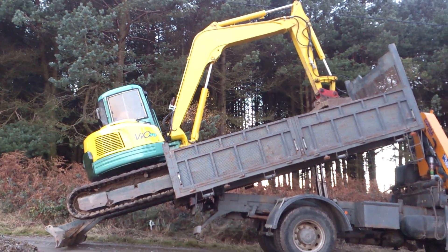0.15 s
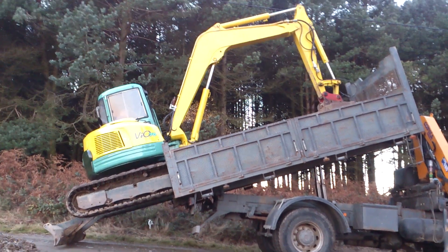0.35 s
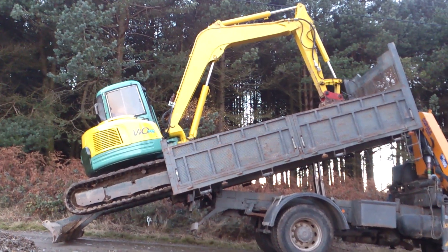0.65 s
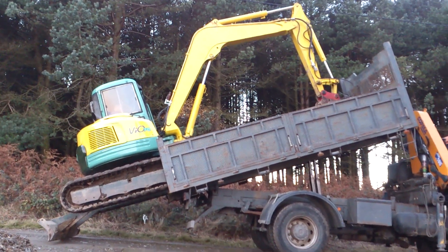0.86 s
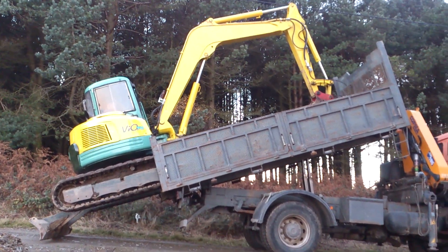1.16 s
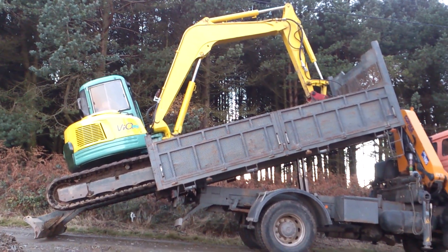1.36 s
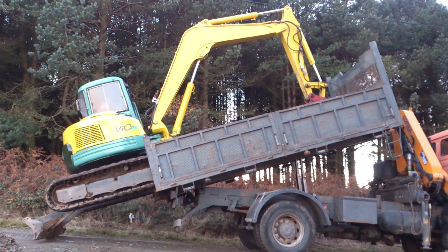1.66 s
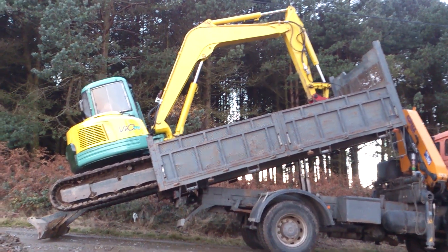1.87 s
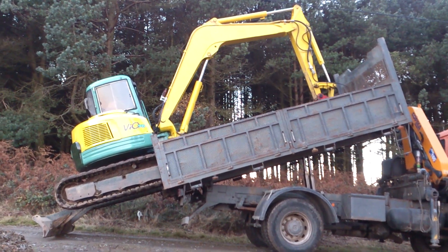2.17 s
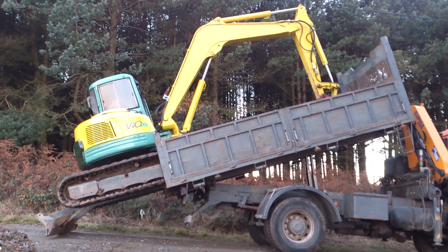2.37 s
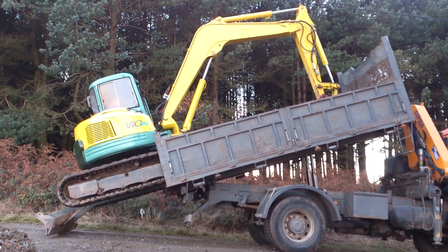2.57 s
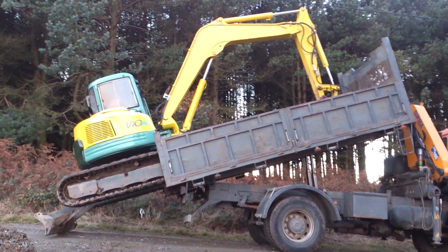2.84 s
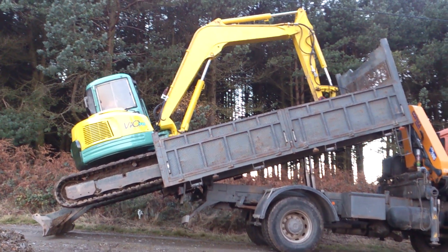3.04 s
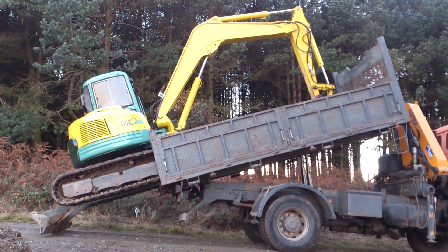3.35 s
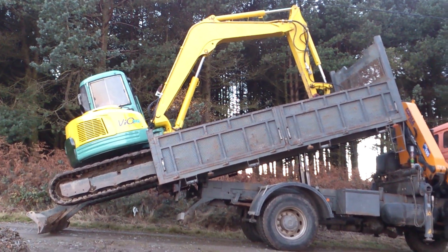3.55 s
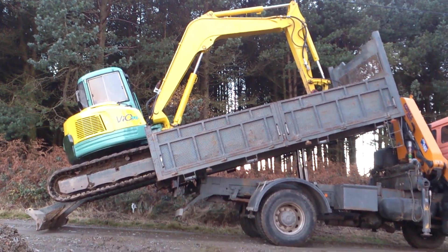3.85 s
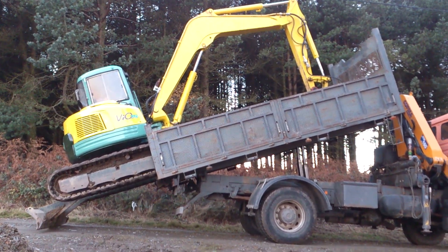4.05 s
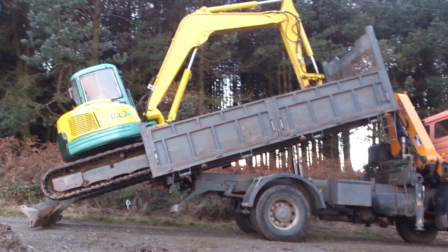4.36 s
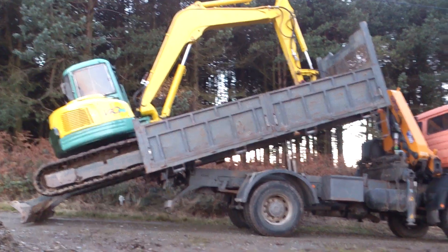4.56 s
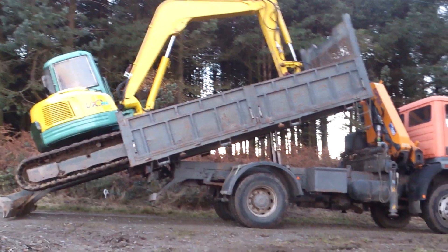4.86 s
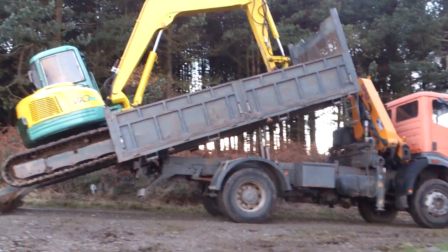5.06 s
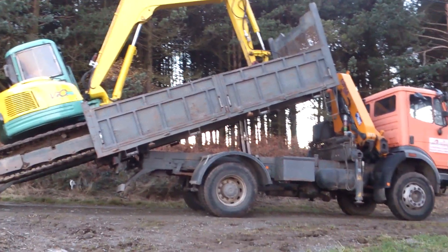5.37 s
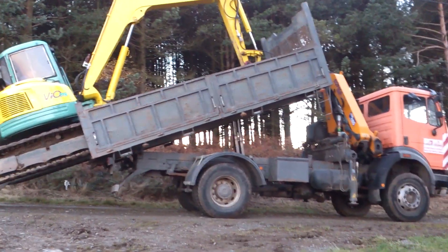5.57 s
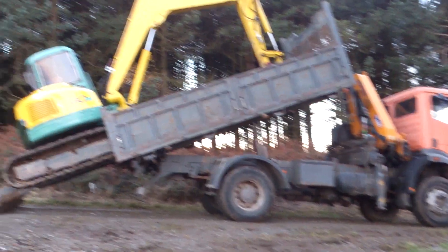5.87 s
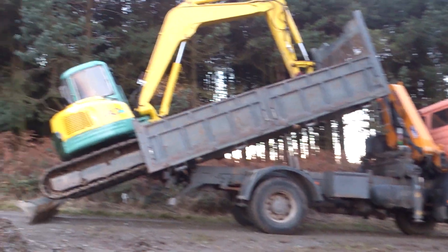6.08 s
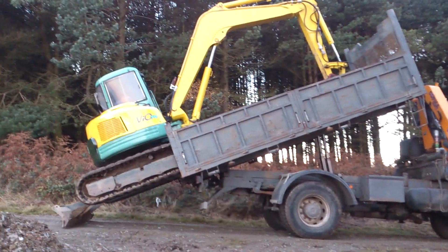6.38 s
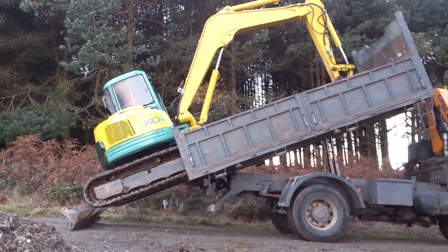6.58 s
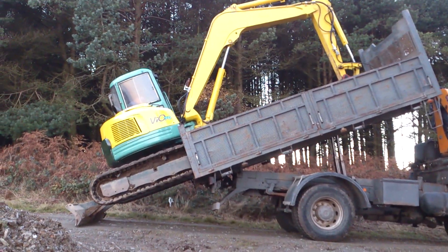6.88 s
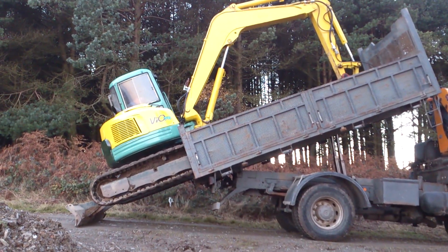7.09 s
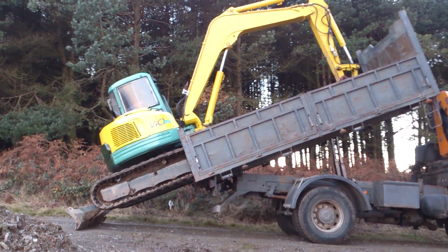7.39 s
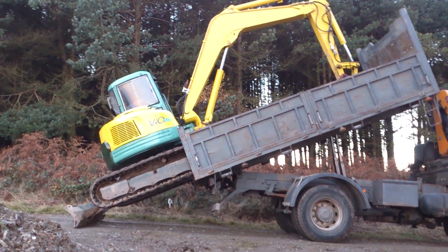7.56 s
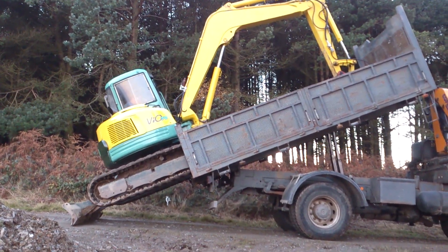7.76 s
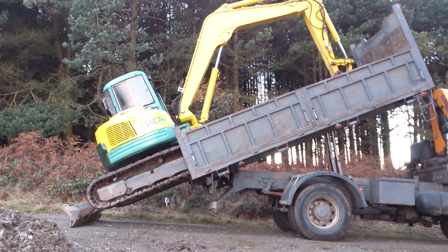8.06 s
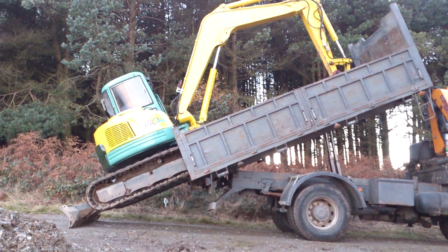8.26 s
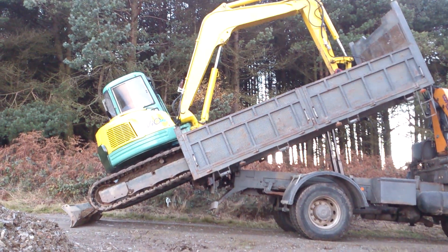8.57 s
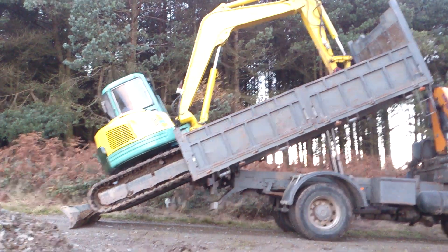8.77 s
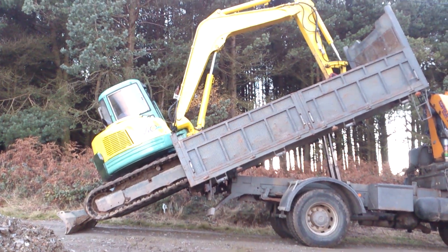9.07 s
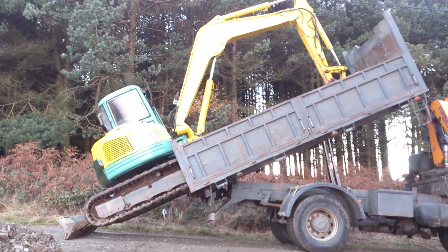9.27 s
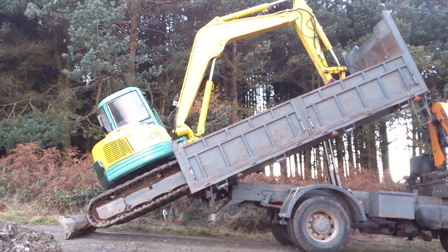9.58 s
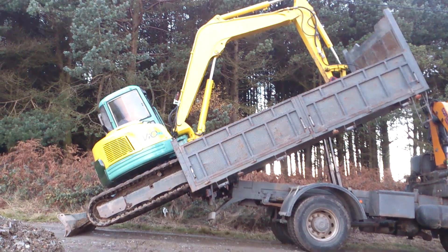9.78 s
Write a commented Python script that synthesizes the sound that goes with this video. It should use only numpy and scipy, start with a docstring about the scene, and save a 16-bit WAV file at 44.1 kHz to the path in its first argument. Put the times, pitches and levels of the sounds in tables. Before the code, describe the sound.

Uneven diesel clatter runs steadily under gusty wind rumble, broken by one loud metal bed crash, then gritty scrapes and hollow track-link clacks.

```python
"""A small diesel excavator idles its way backwards off a tipped steel truck bed, outdoors, at one microphone.
Four uneven cylinders knock and tick over sine-wave exhaust hum, fan noise, a thin whistle and a narrow hiss.
Wind is shaped noise following gusts, with single pressure swings where hard eddies hit the microphone.
The bed clanks and crashes under the weight: noise bursts, ringing modes and a tail from the trees.
The tracks scrape as swelling grit noise and clack as snaps with a hollow ring."""
import sys
import numpy as np
from scipy import signal
from scipy.fft import rfft, irfft, next_fast_len
from scipy.io import wavfile

SR = 44100
rng = np.random.default_rng(int(sys.argv[2]) if len(sys.argv) > 2 else 0)


def digitize_waveform(pressure):
    """Quantize a signal to 16-bit integers and store it at the path in sys.argv[1].

    Rows of a 2-D input are taken as channels; values are limited to [-1, 1].
    """
    field = np.atleast_2d(pressure).T
    bounded = np.clip(field, -1, 1)
    quanta = np.round(bounded * 32767).astype(np.int16)
    wavfile.write(sys.argv[1], SR, quanta)


N = 437913
TIME = np.arange(N) / SR


def amp(db):
    """Decibels to gain."""
    return 10 ** (np.asarray(db) / 20)


def unit(x):
    """Scales to an rms of one."""
    return x / np.sqrt(np.mean(x ** 2) + 1e-20)


def add(mix, s, sound):
    """Mixes a sound in at time s, cut off at the end of the mix."""
    part = mix[max(round(s * SR), 0):][:len(sound)]
    part += sound[:len(part)]


def colour(x, spectrum, loss_db=0):
    """Shapes x by a spectrum (f/Hz, level/dB), with a loss per octave about 3 kHz; rms one."""
    octave = np.log2(np.fft.rfftfreq(2 * len(x), 1 / SR) / 3000 + 1e-3)  # the offset avoids log of zero
    hz, db = np.transpose(spectrum)
    gain = amp(np.interp(octave, np.log2(hz / 3000), db) - loss_db * octave)
    size = next_fast_len(len(x), True)
    gain = np.interp(np.fft.rfftfreq(size), np.fft.rfftfreq(2 * len(x)), gain)
    shaped = irfft(rfft(x, size) * gain, size)
    return unit(shaped[:len(x)])


def noise(spectrum, size, loss_db=0):
    """Coloured noise of rms one."""
    return colour(rng.standard_normal(size), spectrum, loss_db)


def resonate(x, modes):
    """Passes x through parallel resonances (f/Hz, width/Hz, level/dB) of alternating sign."""
    out = np.zeros(len(x))
    for k, (hz, width, db) in enumerate(modes):
        peak = signal.iirpeak(hz, hz / width, SR)
        out += (-1) ** k * amp(db) * signal.lfilter(*peak, x)
    return out


def drift(hz):
    """Random wander of rms one, with hz new values a second joined by straight lines."""
    knots = np.arange(0, TIME[-1] + 1, 1 / hz)
    return unit(np.interp(TIME, knots, rng.standard_normal(len(knots))))


def burst(t, rise, t60, length=0):
    """Swells to one within the rise time, holds to the given length, then dies away."""
    held = max(rise, length)
    return np.clip(t / rise, 0, 1) * np.exp(-np.log(1000) * np.maximum(t - held, 0) / t60)


# engine speed: t/s, firing rate f/Hz
FIRING_RATE = [(0.0, 33.66), (0.6, 34.26), (1.2, 34.58), (1.8, 35.21), (2.4, 35.11), (3.2, 35.39),
               (4.5, 35.22), (6.0, 35.18), (7.2, 35.17), (8.2, 35.04), (9.93, 35.18)]
FIRST_FIRING_S = .0385


def engine_turns():
    """Engine position, counted in firings: the running sum of the firing rate."""
    turns = np.cumsum(np.interp(TIME, *np.transpose(FIRING_RATE))) / SR
    return turns - np.interp(FIRST_FIRING_S, TIME, turns)


# the four cylinders in firing order: relative knock level/dB, relative injector tick level/dB, lag t/s
CYLINDER_FIRINGS = [(-4.5, 11, .0005), (-11.5, 7.5, 0.00037), (-12.5, 9, 0.001965), (-9, 9.5, 0.00081)]
# engine block resonances under a firing: f/Hz, width f/Hz, level/dB
BLOCK_MODES = [(1220, 210, -6.5), (1447, 81, 3), (1657, 69, -3.5), (1878, 144, -2.5), (2630, 210, -11),
               (4100, 820, -19)]
# engine loudness: t/s, knock level/dB, clatter level/dB before a 0.5 dB cut
ENGINE_LEVELS = [(0, -46.5, -47.5), (1.1, -44.5, -48.5), (2.3, -46.5, -49.5), (3.7, -47.5, -49.5),
                 (4.9, -46.5, -49.5), (5.6, -46.5, -52), (6.5, -50.5, -49), (7.6, -50, -48),
                 (8.8, -50, -49.5), (9.93, -51, -46.5)]
# injector clatter spectrum: f/Hz, level/dB per Hz
CLATTER_SPECTRUM = [(500, -11), (750, 8), (1050, 2.5), (1800, -8), (2300, -6), (2800, 5), (3400, -4.5),
                    (4400, -1.5), (5700, -6), (7200, -19), (9000, -15), (11200, -18), (12800, -42),
                    (15500, -36)]


def cylinders(turns):
    """Each firing shakes the block's resonances into a knock and opens a burst of injector clatter."""
    knocks, ticks, t = np.zeros(N), np.zeros(N), TIME[:SR // 10]
    shake = burst(t, 0.00071, 0.017) + 0.19 * burst(t, 0.008, 0.073)
    for k in range(-1, int(turns[-1]) + 1):
        knock_db, tick_db, lag = CYLINDER_FIRINGS[k % len(CYLINDER_FIRINGS)]
        s = np.interp(k, turns, TIME) + lag
        # each cylinder burns nearly the same charge every time
        knock_chance, tick_chance = rng.standard_normal(2)
        knock = unit(resonate(shake * rng.standard_normal(len(t)), BLOCK_MODES))
        add(knocks, s, amp(knock_db + 0.77 * knock_chance) * knock)
        add(ticks, s, amp(tick_db + tick_chance) * burst(t, 0.001, 0.099))
    s, knock_db, clatter_db = np.transpose(ENGINE_LEVELS)
    knocks = colour(knocks, [(300, -20), (1000, -2.0), (1400, 3.5), (3000, -8.5), (6000, -22), (14000, -40)])
    clatter = colour(ticks * rng.standard_normal(N), CLATTER_SPECTRUM)
    return amp(np.interp(TIME, s, knock_db)) * knocks + amp(np.interp(TIME, s, clatter_db) - 0.5) * clatter


# exhaust hum: multiple of the firing rate, level/dB before load and wander
HUM_ORDERS = [(2, -44), (2.5, -59), (3, -46), (3.5, -61), (4, -51), (5, -47), (5.5, -57), (6, -48.5),
              (10, -59.5), (11, -73.5), (13, -76), (15.5, -56), (17, -71.5), (20, -57), (20.5, -60.5),
              (23, -63), (26, -60)]
# how hard the engine works: t/s, level/dB added in full from the tenth multiple up, in part below
ENGINE_LOAD = [(0, 4), (2, 0), (4, 1), (6.5, -0.5), (9.93, 0.5)]


def exhaust_hum(turns):
    """Sines locked to the firings, each wandering in level; load lifts the upper ones most."""
    load_db = np.interp(TIME, *np.transpose(ENGINE_LOAD))
    hum = np.zeros(N)
    for order, db in HUM_ORDERS:
        level = amp(db + 1.4 * drift(8) + load_db * min(order / 10, 1))
        hum += level * np.sin(2 * np.pi * (order * turns + rng.random()))
    return hum


# cooling fan spectrum: f/Hz, level/dB per Hz
FAN_SPECTRUM = [(25, -27), (50, 7), (90, 14.5), (200, 8), (280, 3.5), (480, 4), (720, 3.5), (1020, -6.5),
                (1450, 2), (2200, -8), (4400, -5.5), (7500, -26.5), (11000, -21), (13500, -32)]
FAN_DB = -44.5
WHISTLE_HZ, WHISTLE_WIDTH_HZ, WHISTLE_DB = 9780, 12, -73.5
# a narrow hiss, likely hydraulic, that slowly fades
HISS_HZ, HISS_WIDTH_HZ, HISS_START_DB, HISS_FADE_DB_PER_S = 5480, 180, -62.5, 0.9


def fan_whistle_and_hiss():
    """Steady broadband fan noise, with noise through two sharp resonances for whistle and hiss."""
    whistle = unit(resonate(rng.standard_normal(N), [(WHISTLE_HZ, WHISTLE_WIDTH_HZ, 0)]))
    hiss = unit(resonate(rng.standard_normal(N), [(HISS_HZ, HISS_WIDTH_HZ, 0)]))
    hiss *= amp(HISS_START_DB - HISS_FADE_DB_PER_S * TIME)
    return amp(WHISTLE_DB) * whistle + hiss + amp(FAN_DB) * noise(FAN_SPECTRUM, N)


# gusts of wind: start t/s, length t/s, strength level/dB
WIND_GUSTS = [(0.026, 0.058, -24), (0.152, 0.23, -27), (0.465, .2, -32), (1.387, 0.2, -27),
              (1.669, 0.076, -29.5), (1.82, 0.22, -27), (2.243, 0.058, -24), (2.772, 0.39, -29.5),
              (3.157, 0.25, -23), (3.562, 0.026, -23.5), (3.644, 0.05, -26), (3.842, .65, -41.5),
              (4.602, 0.05, -22), (4.79, 0.29, -24), (5.043, 0.25, -28), (5.354, 0.16, -27.5),
              (5.62, 0.054, -27.5), (5.758, 0.046, -31.5), (5.906, 0.07, -21.5), (6.134, 0.014, -21.5),
              (6.267, 0.018, -26.5), (7.064, .05, -26.5), (7.169, 0.12, -21.5), (7.366, 0.019, -22),
              (7.484, 0.057, -26.5), (7.661, 0.2, -26.5), (7.869, 0.042, -16.5), (7.932, 0.16, -20),
              (8.144, 0.067, -22.5), (8.36, 0.53, -33), (9.069, 0.077, -23.5), (9.19, 0.097, -33.5),
              (9.52, 0.28, -46)]
GUST_RISE_S, GUST_T60_S = 0.011, 0.36
BREEZE_DB = -44  # strength of the light air between the gusts


def gusts():
    """Gusts rise quickly, hold and die away; the faster eddies grow more steeply than the rumble."""
    power, t = np.full(N, amp(BREEZE_DB) ** 2), TIME[:SR]
    for s, length, db in WIND_GUSTS:
        add(power, s, (amp(db) * burst(t, GUST_RISE_S, GUST_T60_S, length)) ** 2)
    gust = np.sqrt(power)
    rumble = noise([(15, -66), (30, -41), (45, -13), (65, -1.5), (110, -3.0), (180, -8.5),
                    (280, -22.0), (500, -53.5), (1500, -97)], N)
    rumble *= amp(1.37 * drift(40) - 2.0)
    eddies = colour(rng.standard_normal(N) * amp(5.26 * drift(110)),
                    [(30, -42), (80, -4.5), (160, -1.0), (280, -1.5), (420, -12), (700, -23),
                     (1200, -36.0), (3000, -85)])
    return gust * rumble + amp(-30.5) * (gust / amp(-23)) ** 1.87 * eddies


# the hardest eddies that hit the microphone: centre t/s, envelope peak level/dB, mean swing f/Hz
MICROPHONE_BUFFETS = [(1.319, -14.5, 170), (1.48, -13, 213), (2.263, -15, 170), (3.08, -16.5, 180),
                      (3.186, -11.5, 224), (3.229, -9, 285), (3.269, -9, 100), (3.349, -11, 268),
                      (3.433, -8.5, 208), (4.886, -11.5, 140), (5.246, -12, 212), (5.94, -17, 135),
                      (7.084, -14, 169), (7.253, -11.5, 234), (7.314, -12.5, 210), (7.882, -7.5, 129),
                      (8.004, -9, 270), (8.165, -5, 257), (9.084, -13.5, 160)]


def buffets():
    """Each passing eddy is a single lopsided swing of pressure, of random phase."""
    out, t = np.zeros(N), TIME[:SR // 20] - 1 / 40
    for s, db, hz in MICROPHONE_BUFFETS:
        swing = np.exp(2j * np.pi * rng.random()) / (1 + 2j * np.pi * hz * t / 4) ** 4
        add(out, s + t[0], amp(db) * swing.real)
    return out


# blows on the truck bed: t/s, clang level/dB, boom level/dB, rise t/s, treble loss level/dB per octave,
# clang t60 t/s
BED_BLOWS = [(2.505, -44, -35, 0.015, 2, 0.57), (2.561, -24, -43, 0.011, 2, 0.22),
             (2.648, -20.5, -31, .009, 4, 0.29), (2.718, -22.5, -43, .012, 4, 0.28),
             (2.747, -9, -21, 0.016, -1.8, 0.21), (2.903, -31.5, -35.5, 0.0029, -2, 0.088),
             (4.592, -31, -23.5, 0.0095, 1.5, 0.22), (4.653, -43, -53, 0.0027, 9, .09)]
# clang spectrum of the steel: f/Hz, level/dB per Hz
CLANG_SPECTRUM = [(250, -15), (480, -14), (650, -8), (880, -5), (1000, -9.5), (1200, -1.5), (1550, -8),
                  (2500, -5.5), (4300, -6), (5600, -13.5), (9800, -25.5), (12500, -40), (14000, -57),
                  (15700, -66)]
# boom spectrum of the bed: f/Hz, level/dB per Hz
BOOM_SPECTRUM = [(60, -19), (130, 0), (200, -6), (310, 2.5), (430, -10.5), (560, -10), (760, -3.5),
                 (1100, -33), (3000, -66)]
# ringing plate modes: f/Hz, relative level/dB, t60 t/s
BED_MODES = [(283, -10, 0.67), (310, -8, .7), (360, -7, .6), (709, -5, 0.45), (888, 1, 0.36),
             (1128, -3, .3), (1222, 1, 0.36), (1794, -1, 0.28), (2554, 1, 0.26), (3002, -2, 0.26),
             (3403, 0, .26), (3694, -1, 0.23), (4178, -1, 0.26), (4472, 0, 0.27)]


def bed():
    """Each blow is a brief rattle of steel: dense clang, low boom, plate modes and a tail from the trees."""
    out, t = np.zeros(N), TIME[:3 * SR // 2]
    for s, clang_db, boom_db, rise, loss_db, t60 in BED_BLOWS:
        # the steel chatters in contact for a moment before it rings out
        contact = np.minimum(t / rise, np.minimum(1, 1.57 * burst(t, rise, t60)))
        clang = noise(CLANG_SPECTRUM, len(t), loss_db) * contact * amp(drift(340)[:len(t)])
        tail = amp(-13.5) * noise(CLANG_SPECTRUM, len(t), loss_db + 4.5) * burst(t, 0.061, 0.66)
        ring = np.zeros(len(t))
        for hz, db, mode_t60 in BED_MODES:
            ring += amp(db) * burst(t, rise, mode_t60) * np.sin(2 * np.pi * (hz * t + rng.random()))
        boom = noise(BOOM_SPECTRUM, len(t)) * (burst(t, 0.023, 0.44) + 0.14 * burst(t, 0.055, 1.75))
        add(out, s, amp(clang_db) * (clang + tail + amp(-11.5) * ring) + amp(boom_db) * boom)
    return out


# steel dragging over grit, building up until it slips free: start t/s, build-up t/s, peak level/dB
GRIT_SCRAPES = [(2.985, 0.034, -41), (3.065, 0.054, -37), (7.673, 0.23, -38), (8.078, 0.056, -44),
                (8.31, 0.094, -47), (8.78, 0.11, -59), (9.05, .12, -54), (9.52, 0.059, -49),
                (9.68, .08, -55)]
# spectrum of both grit and link snaps: f/Hz, level/dB per Hz
SNAP_SPECTRUM = [(400, 0), (1500, -4), (3000, 1), (4300, 3.5), (6500, -6.5), (10000, -12.5), (13000, -30.5),
                 (15500, -39)]
SCRAPE_SWELL = 0.83  # power that bends the build-up and lengthens the decay


def scrapes():
    """Grit grinds under the shoes: rough noise that swells, then dies away."""
    drag, t = np.zeros(N), TIME[:SR // 2]
    for s, length, db in GRIT_SCRAPES:
        add(drag, s, amp(db) * burst(t, length, 0.22) ** SCRAPE_SWELL)
    rough = rng.standard_normal(N) * amp(1.3 * drift(400))
    return drag * colour(rough, SNAP_SPECTRUM, loss_db=0.2)


# track links snapping over: t/s, snap level/dB, hollow ring level/dB before LINK_RING_DB
LINK_CLACKS = [(3.076, -36.5, -45), (3.181, -34.5, -40), (3.203, -39, -48), (3.229, -41, -44),
               (3.381, -46, -42), (3.406, -42, -54), (4.785, -45, -56), (6.018, -42, -41),
               (6.407, -41.5, -37), (6.5, -41, -38), (6.872, -40, -35.5), (7.347, -39.5, -32.5),
               (7.506, -38, -34), (7.614, -38.5, -34.5), (7.76, -37, -33.5), (8.111, -36, -31.5),
               (8.235, -36.5, -35), (8.333, -36, -32.5), (8.82, -44, -59), (9.339, -47, -52),
               (9.507, -33, -27.5), (9.739, -41, -49)]
# hollow link resonances: f/Hz, width f/Hz, level/dB
LINK_MODES = [(436, 60, -13.5), (582, 74, -1), (709, 68, -1), (847, 98, -8.5), (1157, 41, -2.5),
              (1464, 45, -14)]
LINK_CONTACT_T60_S, LINK_RING_DB = 0.15, -16


def clacks():
    """Links snap over as sharp noise and ring hollow as resonated contact noise."""
    out, t = np.zeros(N), TIME[:SR // 2]
    for s, snap_db, ring_db in LINK_CLACKS:
        snap = noise(SNAP_SPECTRUM, len(t)) * (burst(t, 0.00061, 0.076) + 0.19 * burst(t, 0.0067, 0.34))
        contact = rng.standard_normal(len(t)) * burst(t, 0.00066, LINK_CONTACT_T60_S)
        ring = unit(resonate(contact, LINK_MODES))
        add(out, s, amp(snap_db) * snap + amp(ring_db + LINK_RING_DB) * ring)
    return out


def scene():
    """All sources at one microphone."""
    turns = engine_turns()
    engine = cylinders(turns) + exhaust_hum(turns) + fan_whistle_and_hiss()
    wind = gusts() + buffets()
    tracks = scrapes() + clacks()
    return (engine + wind + bed() + tracks)[None]


BASS_HZ, EDGE_HZ = 33, 15750


def record(dry):
    """The microphone's bass roll-off, overload at full scale, then the band limit."""
    thinned = signal.sosfilt(signal.butter(4, BASS_HZ, "high", fs=SR, output="sos"), dry)
    clipped = np.clip(thinned, -1, 1)
    band_limit = signal.firwin(1023, EDGE_HZ, window=("kaiser", 9), fs=SR)
    return signal.oaconvolve(clipped, band_limit[None], "same")


dry = scene()
out = record(dry)
digitize_waveform(out)
```